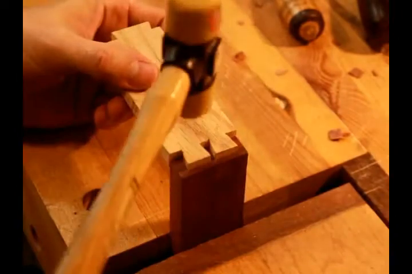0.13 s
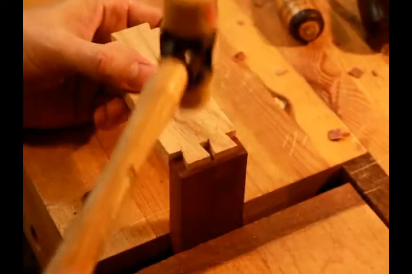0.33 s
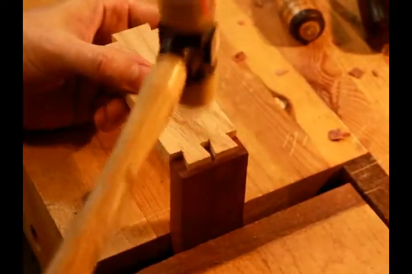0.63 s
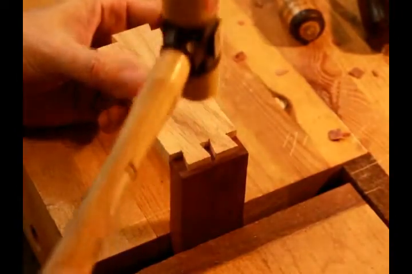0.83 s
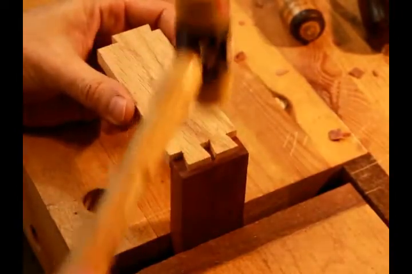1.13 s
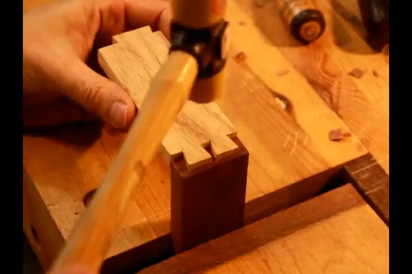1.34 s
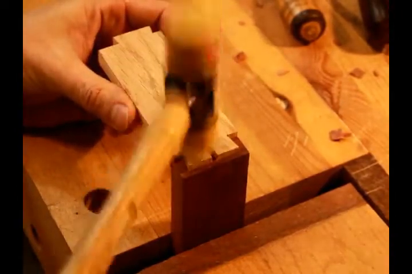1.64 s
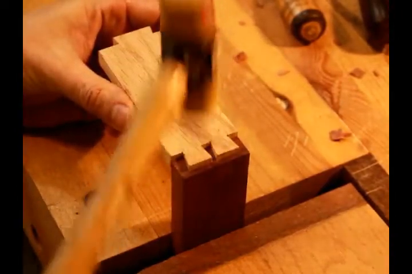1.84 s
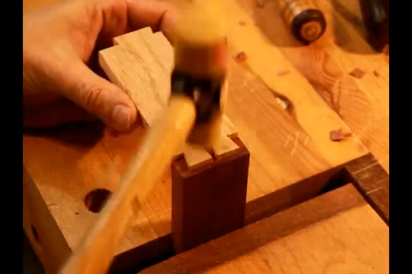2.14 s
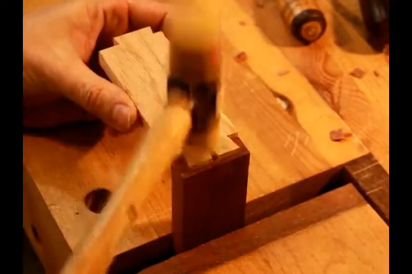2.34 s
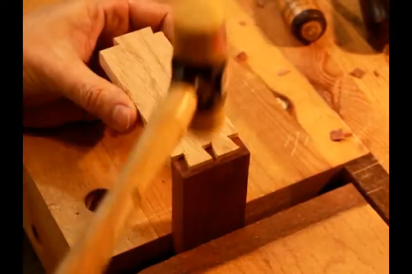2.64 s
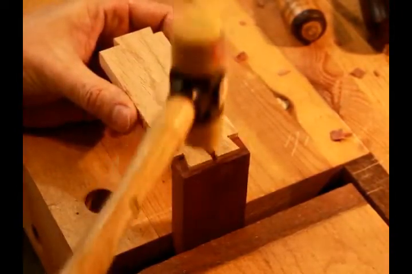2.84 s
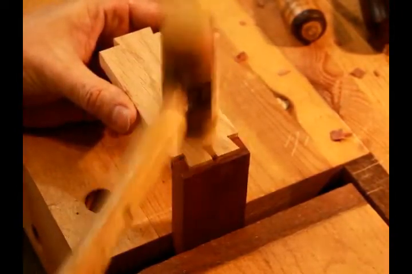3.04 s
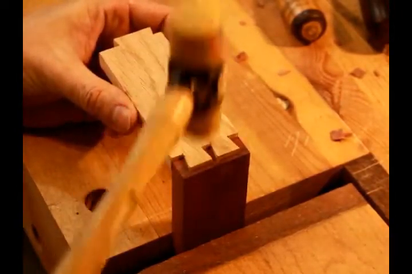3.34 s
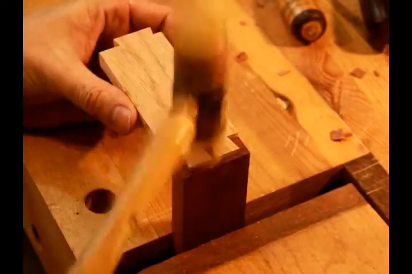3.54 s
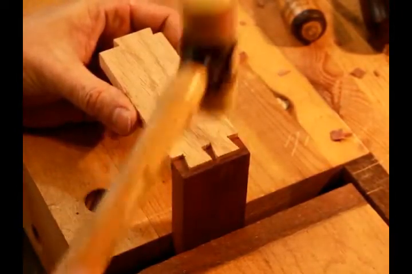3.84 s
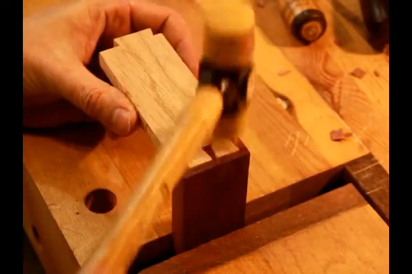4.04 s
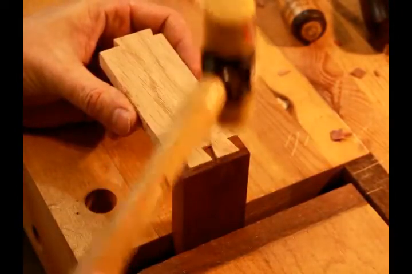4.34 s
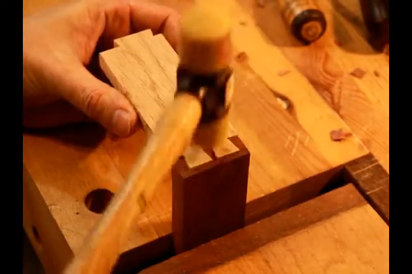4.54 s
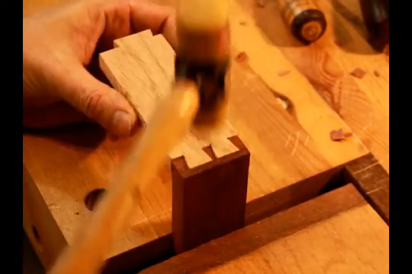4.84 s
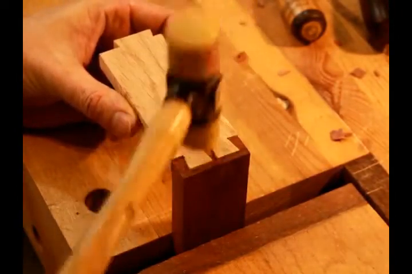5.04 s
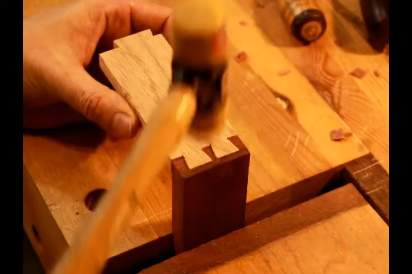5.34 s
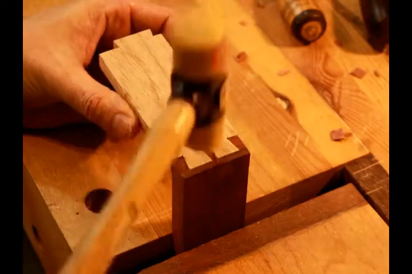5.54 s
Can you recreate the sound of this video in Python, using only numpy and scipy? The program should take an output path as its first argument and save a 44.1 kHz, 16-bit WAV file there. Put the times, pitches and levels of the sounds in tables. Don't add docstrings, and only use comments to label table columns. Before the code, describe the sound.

A small mallet taps a wooden joint together at about four even knocks a second, growing firmer, in a small hard workshop.

```python
import sys
import numpy as np
from scipy import signal
from scipy.fft import rfft, irfft
from scipy.io import wavfile
from scipy.ndimage import uniform_filter1d

SR = 44100
rng = np.random.default_rng(int(sys.argv[2]) if len(sys.argv) > 2 else 0)


def pcm_store(signal):
    levels = np.round(np.clip(np.atleast_2d(signal), -1, 1) * 32767)
    wavfile.write(sys.argv[1], SR, levels.astype(np.int16).T)


def volts(x):
    e = np.asarray(x, float) / 20
    return 10 ** e


N = 251370
LEAD = 4410

# start in seconds, then thump, bench, board and face levels in dB.
BLOWS = [(-0.045, 5, -7, -30, -55), (0.1975, 6, -2, -1, -10.5), (0.44, 8.5, -5, 0.5, -12.5),
         (0.6788, 9.5, -0.5, -2.5, -2.5), (0.9208, 12.5, -1, -2.5, 1), (1.1616, 6.5, 4, 1, -1.5),
         (1.3949, 9.5, 1, 1.5, 2.1), (1.6272, 13, -2.5, 0, 1.7), (1.862, 12.5, 2, 2, -0.5),
         (2.091, 13.5, 1.5, 5.5, 1.5), (2.3287, 14, 5, -1.2, 0.2), (2.5608, 14, 4, 3.5, -2),
         (2.7916, 16.5, 5.5, -2.2, 0.4), (3.034, 17, 7.5, -1, -0.5), (3.287, 18.5, 10.5, 3, -5.5),
         (3.5313, 18.5, 11.5, 9.5, -4.5), (3.7778, 18, 13, 1.3, -9), (4.031, 11.5, -0.5, 7.5, -2.5),
         (4.279, 14.5, 3, 7, -7), (4.5283, 16, 5, 4.5, -1), (4.785, 17.5, 7, -5, -1),
         (5.033, 17.5, 11.5, 4, -2), (5.2818, 19, 13, 4, -5.5), (5.5318, 19, 15.5, 8, -16)]


def read(points, hz):
    point_hz, value = np.transpose(points)
    return np.interp(np.log(hz + 1), np.log(point_hz + 1), value)


def causal(gain):
    return np.exp(np.conj(signal.hilbert(np.log(gain))))


def body(modes):
    t = np.arange(SR // 2) / SR
    hz, db, t60, polarity = np.transpose(modes)[:, :, None]
    tones = polarity * volts(db - 60 * t / t60) * np.sin(2 * np.pi * hz * t + 1)
    swell = 1 - .62 * np.exp(-t / .0215)
    onset = np.minimum(t / .0006, 1)
    return tones * swell * onset


def thump():
    # Hz, level in dB, t60 in seconds, polarity
    air_and_bench = [(80.8, -24.3, 0.19, -1), (82.7, -17.6, 0.07, 1), (93.7, -28.7, 0.29, -1),
                     (146.1, -19.9, 0.25, 1), (153.7, -12.5, 0.25, -1), (178.7, -26.3, 0.32, 1),
                     (197.4, -22.6, 0.3, 1), (206.7, -21.5, 0.29, 1), (238.3, -14.1, 0.16, 1),
                     (240.3, -20.4, 0.31, -1), (250.4, -16.0, 0.26, 1), (253.6, -9.5, 0.22, -1),
                     (260.3, -16.6, 0.26, -1), (269.6, -12.2, 0.31, -1), (291.9, -16.0, 0.25, 1),
                     (305.6, -10.9, 0.16, 1), (316.1, -14.1, 0.14, -1), (328.7, -17.8, 0.28, -1),
                     (329.6, -9.8, 0.11, 1), (339.0, 0.0, 0.18, 1), (344.2, -8.9, 0.22, -1), (355.6, -10.8, 0.2, -1),
                     (370.6, -14.1, 0.22, -1), (384.1, -3.5, 0.1, 1), (394.8, -12.5, 0.22, -1),
                     (406.4, -17.9, 0.27, 1), (421.2, -15.8, 0.2, 1), (439.5, -18.5, 0.38, -1),
                     (445.3, -27.5, 0.38, 1), (457.2, -21.5, 0.28, -1),
                     (464.3, -21.8, 0.31, -1), (483.2, -4.7, 0.13, 1), (491.8, -21.7, 0.24, -1),
             (499.3, -11.9, 0.22, 1), (512.8, -22.5, 0.38, -1), (518.0, -8.5, 0.2, 1),
             (522.9, -25.0, 0.38, 1), (533.6, -17.2, 0.28, 1), (536.1, -12.5, 0.16, -1),
             (541.7, -14.6, 0.2, 1), (559.5, -18.7, 0.2, 1), (571.8, -20.2, 0.24, 1),
             (589.8, -22.0, 0.21, 1), (629.1, -25.4, 0.26, -1), (645.0, -16.7, 0.13, 1),
             (661.2, -11.3, 0.14, 1), (675.4, -13.9, 0.13, -1), (708.9, -12.0, 0.07, -1),
             (735.1, -29.4, 0.36, 1), (743.8, -18.3, 0.28, -1), (773.7, -10.1, 0.12, 1),
             (785.2, -26.8, 0.28, 1), (836.6, -17.8, 0.18, -1), (863.9, -16.9, 0.16, -1),
             (884.0, -28.5, 0.23, 1), (947.1, -15.9, 0.17, -1), (996.0, -18.8, 0.15, 1),
             (1020.6, -27.4, 0.26, 1), (1046.2, -26.7, 0.18, -1), (1059.1, -38.3, 0.27, 1)]
    modes = np.array(air_and_bench)
    thump_db, bench_db = np.transpose(BLOWS)[1:3, :, None]
    deep = np.clip((250 - modes[:, 0]) / 60, 0, 1)
    high = np.clip((modes[:, 0] - 560) / 150, 0, 1)
    db = thump_db - 42.5
    db = db + deep * 0.047 * (thump_db - 23.5)
    db += high * (bench_db + 8 - thump_db)
    db += (.5 + 1.7 * high) * rng.standard_normal(db.shape)
    out = np.zeros(N + LEAD + SR)
    for blow, sound in zip(BLOWS, volts(db) @ body(modes)):
        at = round(blow[0] * SR) + LEAD - 7
        out[at:at + len(sound)] += sound
    return out[:N + LEAD]


def shudder():
    start, thump_db = np.transpose(BLOWS)[:2]
    spikes = np.zeros(N + LEAD)
    spikes[np.round(start * SR).astype(int) + LEAD] = volts(1.24 * thump_db - 59)
    t = np.arange(SR // 3) / SR
    jolt = volts(-60 * t / 0.32) * np.minimum(t / 0.0084, 1)
    swell = signal.oaconvolve(spikes, jolt)[:N + LEAD]
    low = signal.butter(N=2, Wn=[35, 110], btype="band", fs=SR, output="sos")
    return signal.sosfilt(low, swell * rng.standard_normal(N + LEAD))


def ring_power(s, parts_db, f):
    # Hz
    # while the joint is loose, Hz once seated, width in Hz, level in dB.
    rings = [(660, 660, 100, -1), (1020, 760, 100, 0), (1420, 3100, 110, -9), (1540, 1705, 560, -3.34),
             (2000, 1800, 580, -8.5), (2360, 2653, 404, 0.33), (4300, 4174, 260, -12.5),
             (4850, 5100, 2180, -0.44), (6600, 6900, 800, -15), (7700, 8150, 540, -16),
             (9700, 10100, 1400, -24.5), (11900, 11800, 1900, -27)]
    # thump, bench, board and face shares in dB per dB.
    drive = [(0.35, .2, .02, .02), (0.073, 0.085, .1, .1), (0.37, 0.083, .05, 0.22),
             (0.091, 0.53, .05, .05), (.05, .1, 0.15, 0.48), (.01, .01, 0.96, .01), (0.87, .05, 0.042, 0.9),
             (0.0034, .01, .05, 1), (0.37, .05, .1, .6), (0.48, .05, 0.067, 0.27), (0.25, .05, 0.16, 0.82),
             (0.48, .05, .05, 0.83)]
    seated_s, seating_s = 2.64, 0.91
    stray_pitch, stray_db = 0.012, 0.85
    loose_hz, seated_hz, width, ring_db = np.transpose(rings)[:, :, None]
    detune, spot = rng.standard_normal((2, len(rings), 1))
    home = .5 + .5 * np.tanh((s - seated_s) / seating_s)
    hz = (loose_hz + home * (seated_hz - loose_hz)) * (1 + stray_pitch * detune)
    db = ring_db + np.dot(drive, parts_db)[:, None] + stray_db * spot
    power = volts(db) ** 2 / (1 + (2 * (f - hz) / width) ** 2) ** 1.66
    return power.sum(axis=0)


def catch_power(s, f):
    # time of the blow in seconds, Hz, width in Hz, level in dB.
    catches = [(0.44, 1140, 900, -9), (1.1615, 950, 200, 6), (1.1615, 2000, 800, 4.5),
               (1.1615, 8000, 1900, -6.5), (1.1615, 4470, 800, 0), (1.3948, 9600, 850, -12),
               (1.6271, 5660, 900, 0), (1.6271, 3020, 910, -5), (1.8619, 2780, 710, 0),
               (2.091, 1680, 500, 5.5), (2.3287, 3000, 895, -3.5), (2.3287, 7880, 300, -4),
               (2.5606, 1750, 594, 5), (2.7916, 8300, 1100, -7), (3.5314, 6430, 900, -4),
               (2.5606, 6230, 250, -7), (3.287, 4230, 230, 4.5), (4.031, 2480, 330, 12.5),
               (4.031, 5160, 600, 3), (4.031, 1050, 400, 4), (4.2789, 10100, 1490, -33),
               (4.5284, 2390, 300, 3), (4.5284, 5600, 900, -5), (4.5284, 4300, 350, 8.5),
               (5.033, 4410, 300, 3.7), (5.2818, 4300, 200, -7), (5.5319, 4350, 200, 5)]
    power = np.zeros(len(f))
    for catch_s, hz, width, db in catches:
        if abs(catch_s - s) < .1:
            power += volts(db) ** 2 / (1 + (2 * (f - hz) / width) ** 2) ** 2.4
    return power


def click_gain(thump_db, f):
    # Hz, level in dB.
    click = [(1150, 3.5), (1900, -4.5), (3400, -7.5), (5800, -12.5), (9000, -17), (12000, -25),
             (15000, -28)]
    return volts(read(click, f) - 14.5 + 0.81 * thump_db)


def rim_gain(s, f):
    # time in seconds, treble lift in dB.
    rim = [(0.2, -7), (0.92, 0), (1.39, -3), (1.86, -2.5), (2.56, 0.5), (2.79, 0.5), (3.03, -6.5),
           (3.29, 5), (4.03, 2), (4.28, 6.5), (4.78, -2), (5.53, 5)]
    rim_hz = 6500
    return volts(np.interp(s, *np.transpose(rim)) / (1 + (rim_hz / (f + 1)) ** 6))


def grain_gains():
    lumps = rng.standard_normal((len(BLOWS), 2048))
    lumps = uniform_filter1d(uniform_filter1d(lumps, size=16), size=16)
    mirrored = np.roll(lumps[:, ::-1], 1, axis=1)
    return volts(1.12 * (lumps + mirrored) / lumps.std() / np.sqrt(2))


def cracks():
    out = np.zeros(N + LEAD)
    f = abs(np.fft.fftfreq(2048, 1 / SR))
    settle = uniform_filter1d(rng.standard_normal((len(BLOWS), 1025)), size=40, axis=1)
    lag = .0007 * (1 + np.tanh(8.0 * settle))
    small = volts(-28.5) + 1 / (1 + (720 / (f + 1)) ** 4)
    fade = np.hanning(2048)[1024:]
    for (s, *parts_db), late, grain in zip(BLOWS, lag, grain_gains()):
        rings = ring_power(s, parts_db, f) + catch_power(s, f)
        contact = np.sqrt(click_gain(parts_db[0], f) ** 2 + rings)
        colour = causal(small * rim_gain(s, f) * grain * contact)[:1025]
        smear = np.exp(-2j * np.pi * np.cumsum(late) * f[1])
        at = round(s * SR) + LEAD
        out[at:at + 1024] += fade * irfft(colour * smear)[:1024]
    return out


def workshop(tail_db):
    # Hz, level in dB.
    facing = [(600, -11), (1700, -10), (2600, -1.5), (3500, -5), (4300, 1.5), (5000, -6.5), (7000, 0.5),
              (8000, 6), (9000, 3.5), (10200, -1), (12500, -3.5), (15000, -1)]
    # delay in seconds, level in dB.
    echoes = [
        (.004, -12.5),
        (.0058, -25),
        (.0075, -17),
        (.0098, -15.5),
        (0.0141, -17),
        (0.021, -25),
    ]
    # Hz, t60 in seconds.
    tail = [(400, 0.5), (1060, 0.28), (2790, 0.29), (7350, 0.26), (11000, 0.25), (15500, 0.09)]
    size = SR // 2
    reflections = rng.choice([-1., 1.], size) * (rng.random(size) < .25)
    reflections *= np.clip((np.arange(size) / SR - .001) / 0.0033, 0, 1)
    hz, t, z = signal.stft(reflections, SR, nperseg=128)
    t60 = read(tail, hz)[:, None]
    z *= volts(-60 * t / t60) + volts(-30.0 - 60 * t / (0.89 * t60))
    z /= np.linalg.norm(z, axis=1)[:, None]
    answer = signal.istft(z, SR, nperseg=128)[1]
    answer *= volts(tail_db) / np.linalg.norm(answer)
    direct_gain = volts(read(facing, abs(np.fft.fftfreq(256, 1 / SR))))
    answer[:256] += np.fft.ifft(causal(direct_gain)).real
    for s, db in echoes:
        answer[round(s * SR)] += volts(db)
    return answer


def hush():
    # Hz, level in dB per Hz.
    floor = [(20, -3), (60, -5), (200, 4.5), (600, -9.5), (2000, -32), (6000, -32.5), (16000, -39)]
    spectrum = rfft(rng.standard_normal(N)) * volts(read(floor, np.fft.rfftfreq(N, 1 / SR)))
    noise = irfft(spectrum, N)
    return volts(-76) * noise / noise.std()


def scene():
    bright = signal.oaconvolve(cracks(), workshop(tail_db=-0.59))[:N + LEAD]
    struck = bright + thump() + shudder()
    return (struck[LEAD:] + hush())[None]


def top_cut(x):
    return signal.sosfilt(signal.butter(12, 16750, fs=SR, output="sos"), x)


def record(dry):
    band = signal.butter(N=2, Wn=40, btype="high", fs=SR, output="sos")
    top = signal.firwin2(255, [0, 15800, 16000, 16600, 16800, SR / 2], [1, 1, .06, .04, 0, 0], fs=SR)
    mix = signal.oaconvolve(signal.sosfilt(band, dry), top[None], "same")
    return top_cut(mix)


dry = scene()
out = record(dry)
pcm_store(out)
```